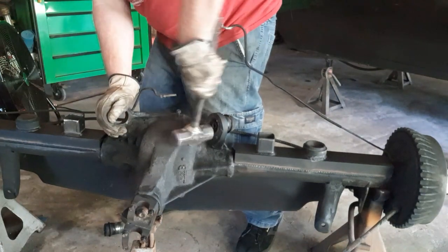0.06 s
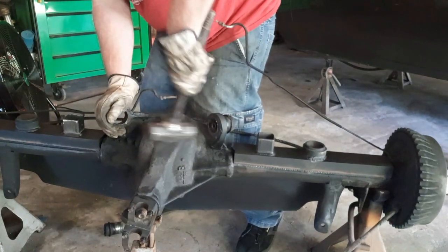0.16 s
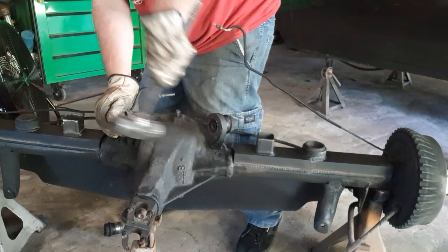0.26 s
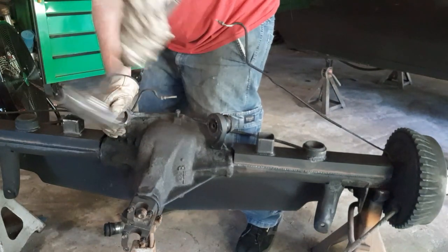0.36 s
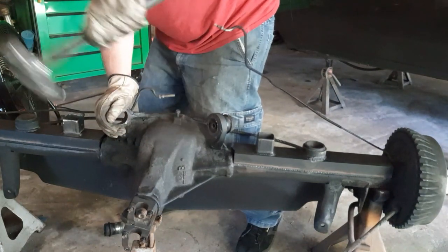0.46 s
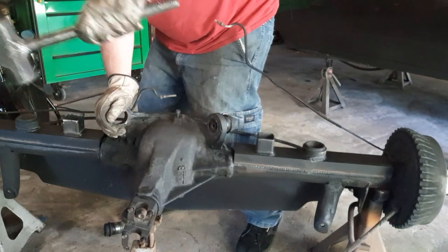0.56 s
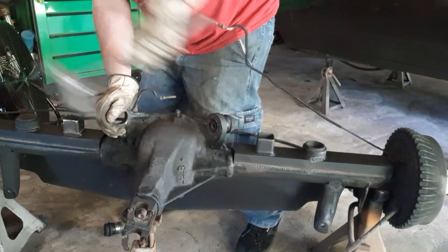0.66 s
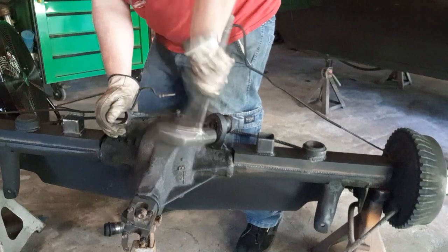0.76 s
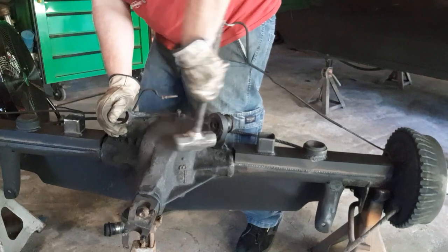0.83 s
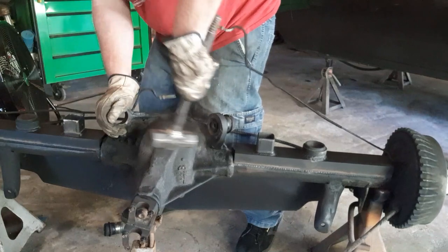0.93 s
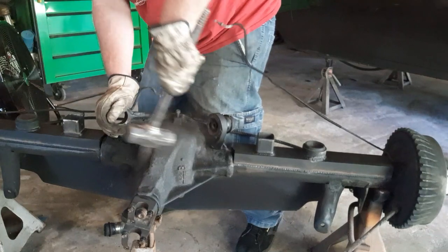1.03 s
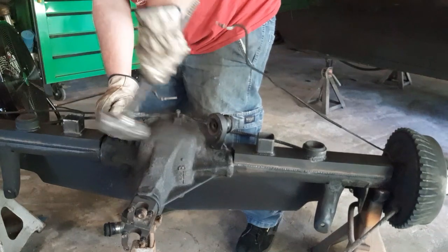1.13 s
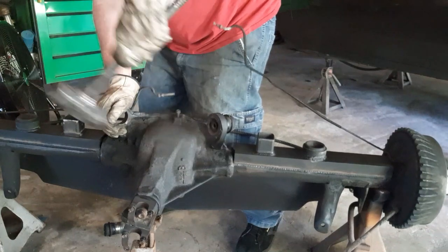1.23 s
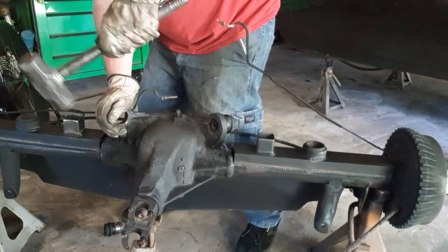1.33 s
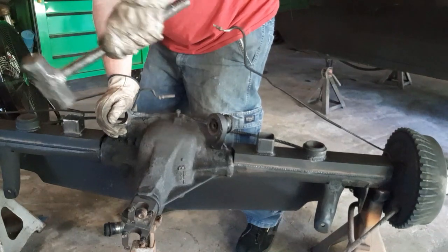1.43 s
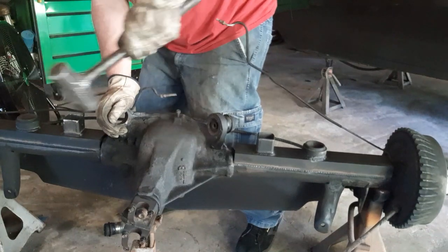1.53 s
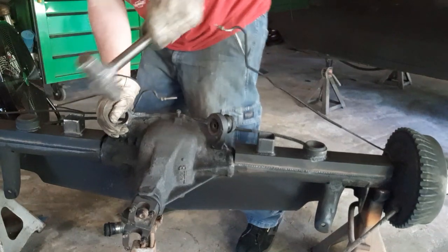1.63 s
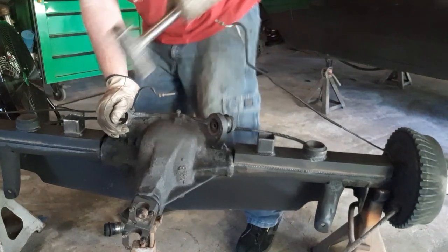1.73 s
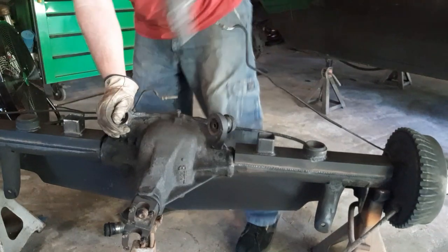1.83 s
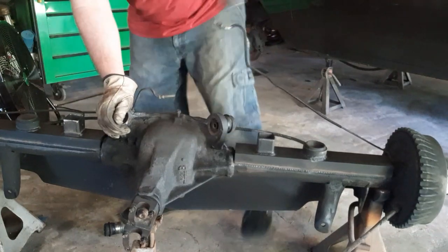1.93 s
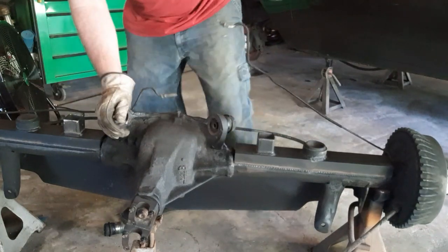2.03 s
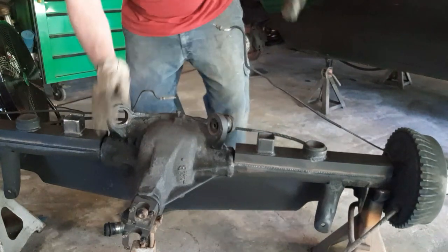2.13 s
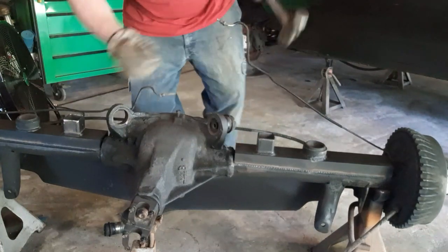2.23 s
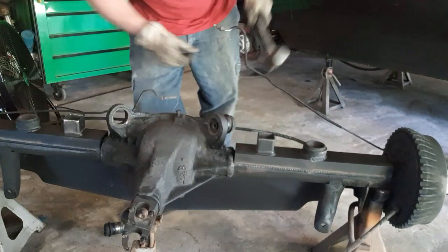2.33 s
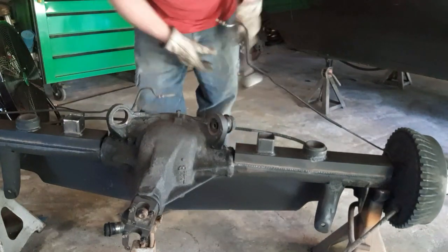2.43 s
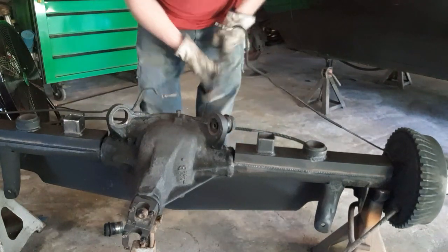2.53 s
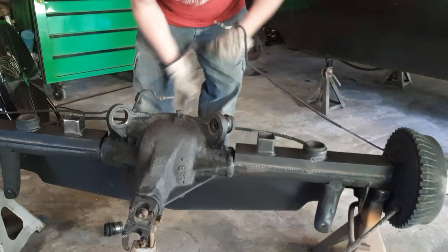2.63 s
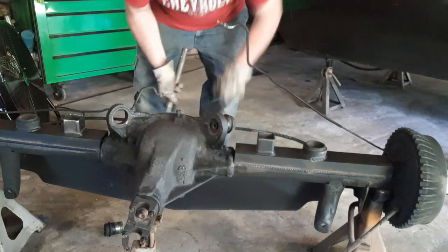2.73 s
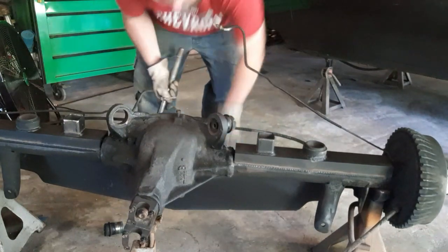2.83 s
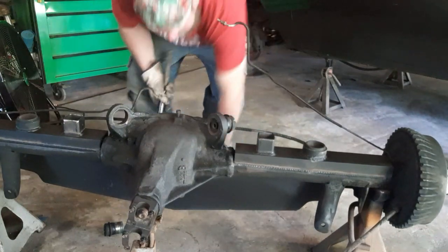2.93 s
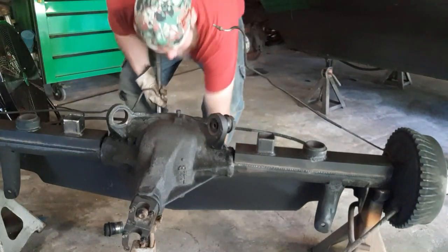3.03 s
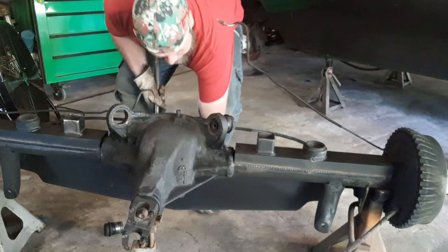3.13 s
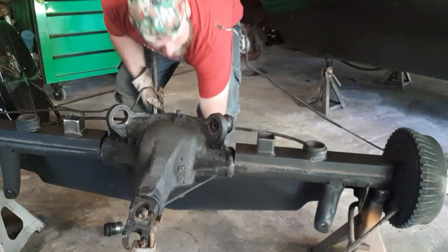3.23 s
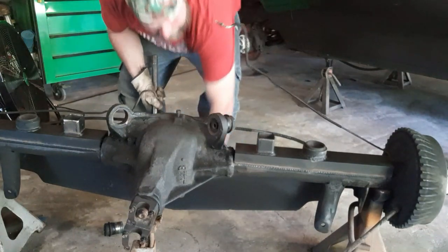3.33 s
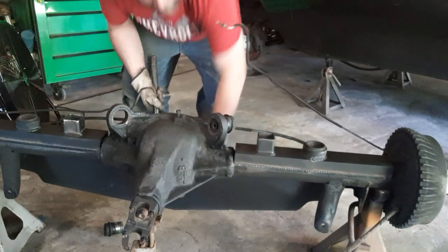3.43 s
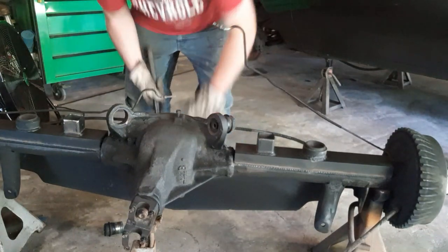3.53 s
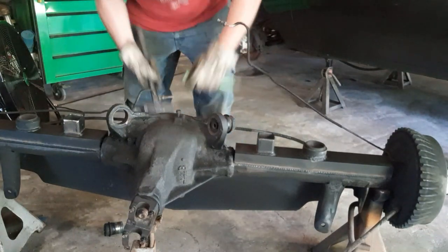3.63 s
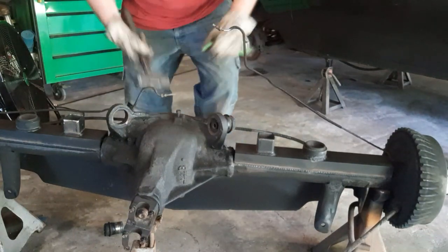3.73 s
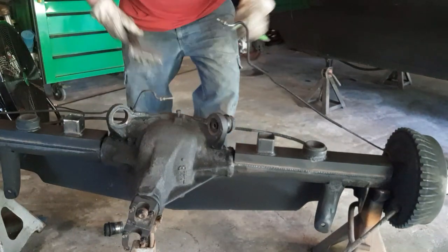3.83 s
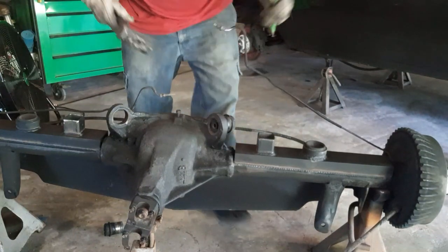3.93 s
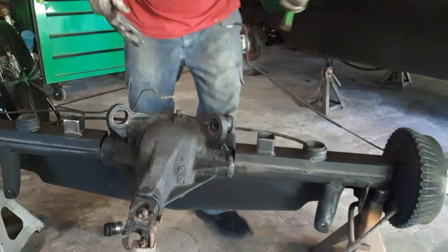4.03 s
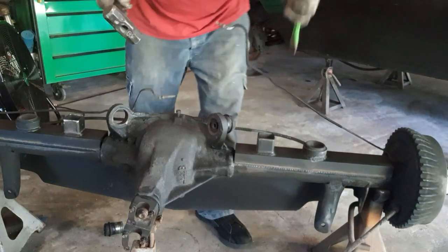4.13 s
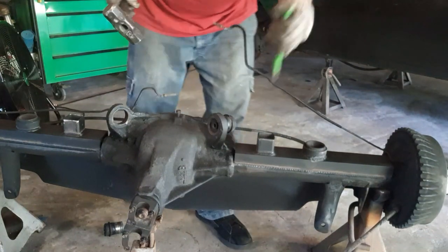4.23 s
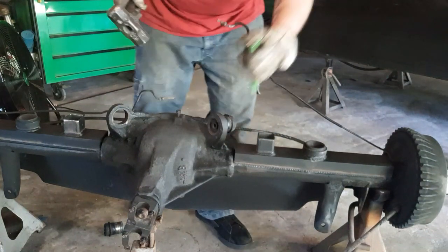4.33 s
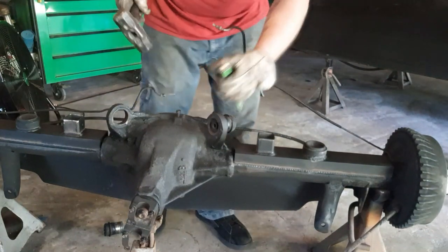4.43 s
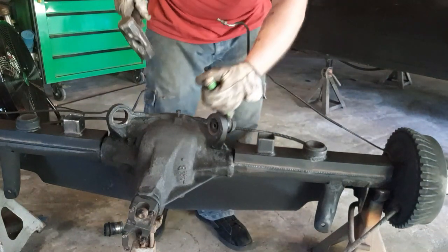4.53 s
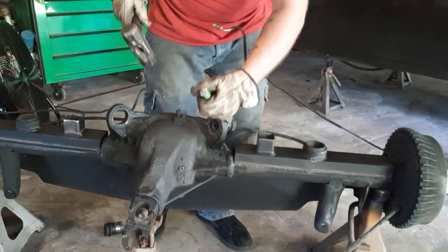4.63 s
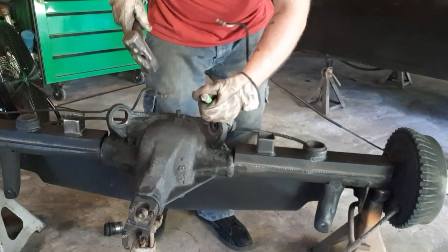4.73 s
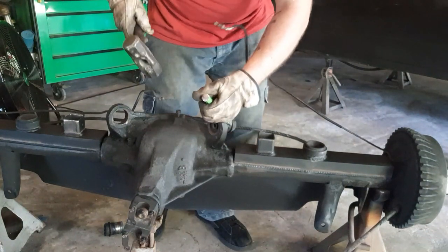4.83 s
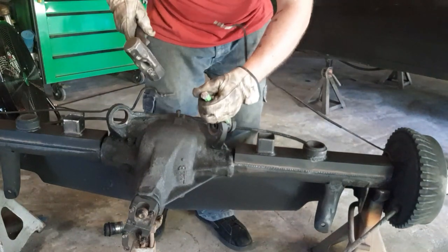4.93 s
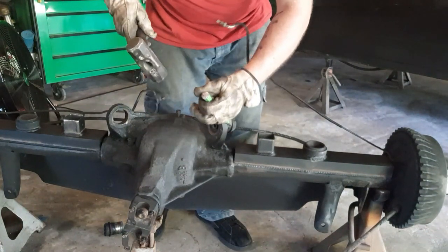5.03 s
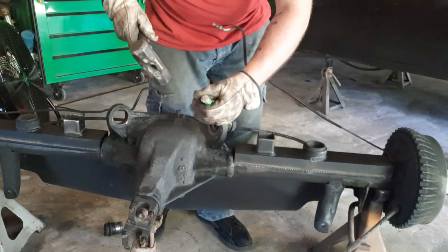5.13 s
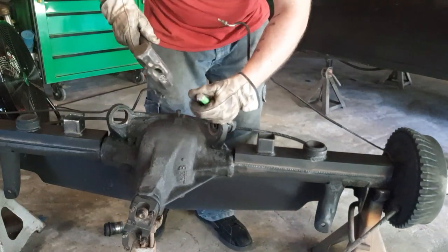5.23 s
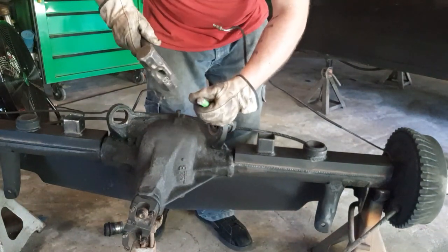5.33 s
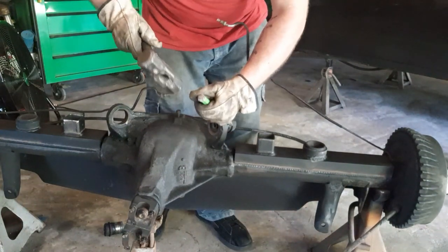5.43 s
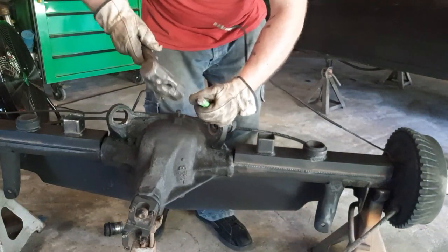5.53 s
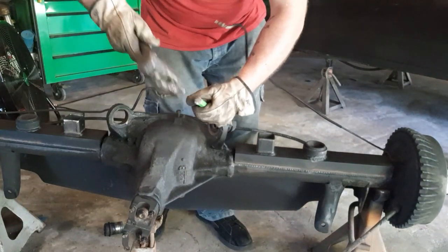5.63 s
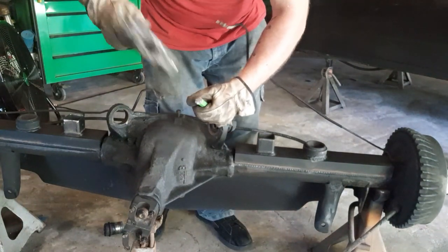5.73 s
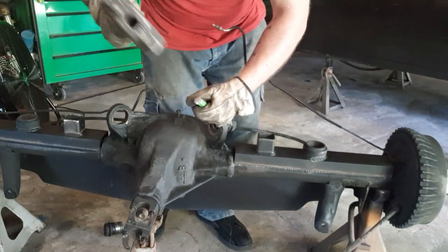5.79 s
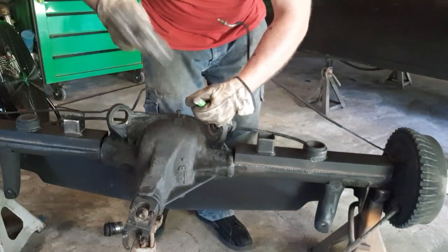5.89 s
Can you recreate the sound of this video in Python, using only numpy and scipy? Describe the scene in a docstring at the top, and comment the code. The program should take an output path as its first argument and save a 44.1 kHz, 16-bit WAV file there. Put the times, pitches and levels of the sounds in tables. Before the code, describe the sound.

A small, hard-surfaced garage heard close up in stereo. Just after 0 s, while an earlier lighter blow still rings, a hammer hits steel against a heavy cast axle housing: a violent crack, bright clang, short rattle and low thud from the stands. A second, sharper and drier blow lands at 0.8 s. The dense clang dies quickly, leaving a thin, wavering metallic ring; the gain stays ducked, then recovers around 1.8 to 2.1 s, lifting the faint ring and air. At 2.3 s there is a dull low bump that rings, then gritty shoe, glove and cloth scuffs at 2.5 and 2.75 s, the latter with a knock. A loose steel tool slides and clinks in quick succession at 3.2 to 3.4 s. Lighter scuffs follow at 3.6 and 4.0 s, a stronger one near 4.5, a small metal tap at 4.65, a soft ringing bump at 5.1 and a tiny tick at 5.4, over low rumble.

```python
"""A small garage, close up: two last hammer blows on a steel drift set against a cast axle housing, then handling.
The housing rings in damped modes, under a noise crack, a rattle and a thud of the axle on its stands.
Shoes, gloves and cloth scuff as shaped noise; the housing is tapped, a loose steel tool and a small part clink.
Crack and clinks also reach the two microphone ports by way of the room, over still air and a low rumble.
The camera's gain control ducks on the blows and recovers about a second later."""
import sys
import numpy as np
from scipy import signal
from scipy.fft import rfft, irfft
from scipy.io import wavfile

SR = 44100
rng = np.random.default_rng(int(sys.argv[2]) if len(sys.argv) > 2 else 0)


def to_wav(s):
    """Save 16-bit WAV."""
    ch = np.atleast_2d(s).T  # columns
    pcm = np.round(np.clip(ch, -1, 1) * 32767)  # PCM
    wavfile.write(sys.argv[1], SR, pcm.astype(np.int16))


def undo_db(level):
    """Turn decibels back into plain size, where 20 dB means ten times bigger."""
    steps = np.asarray(level, float) / 20
    return 10 ** steps


N = 262836
LEAD = SR  # samples run before time zero, so that earlier sound is already under way
TIME = np.arange(-LEAD, N) / SR
HZ = np.maximum(np.fft.rfftfreq(len(TIME), 1 / SR), 1)

# Contacts on the housing. Each row: time in seconds, relative ring in dB, clatter in dB,
# clatter decay time in seconds, contact brightness in Hz, relative thud in dB.
CONTACTS = [(0.0567, 1, 6.5, 0.026, 18000, -12.5), (0.8094, 2, 5.5, 0.011, 14870, -27),
            (2.048, -75, -46, 0.0015, 20020, -77.5), (2.317, -29, -28.5, 0.02, 240, -68),
            (2.751, -51, -33.5, 0.019, 6100, -60.5), (3.162, -73, -56, 0.0029, 20000, -69),
            (4.019, -64, -58, 0.0019, 9600, -55.5), (4.649, -39.5, -37, 0.035, 2600, -73.5),
            (4.789, -67.5, -53, 0.0029, 14000, -88), (5.078, -26, -38.5, 0.013, 667, -72),
            (5.379, -45.5, -70, 0.0035, 4000, -63)]
# Modes of housing and axle tubes. Each row: frequency in Hz, relative level in dB, time to fall 60 dB in seconds.
HOUSING_MODES = [(256, -50, 2.1), (297, -49, 1.8), (409.3, -54, 6.9), (474.7, -38.5, 2.7), (522, -15, 0.34),
                 (552.2, -36.5, 1.3), (684, -40, .6), (765, -60, 3.1), (843, -14, 0.23), (1111, -26, 0.85),
                 (1210, -57.5, 2.0), (1296, -24.5, 0.7), (1464, -19, .3), (1588.4, -38, .9),
                 (1775, -46, 1.7), (1846, -18, 0.14), (2097, -14.5, 0.065), (2400, -51, 1.0),
                 (2605, -54, 1.5), (2695, -16, 0.1), (2810, -61, 1), (3197, -58.5, 1.4), (3419, -19.5, .33),
                 (3733, -16, .28), (4020, -15, 0.14), (3830, -62, 2.9), (4170, -62.5, 1.5),
                 (6650, -14.5, 0.37), (11700, -20.5, .22), (13500, -22.5, .25), (14065, -13.5, .3),
                 (3700, -54.5, 1.2)]
# How alike the left and right ports hear a sound. Each row: frequency in Hz, likeness from 0 to 1.
PORT_LIKENESS = [(50, 0.6), (300, 1), (700, 0.2), (1200, .05), (12000, 0.1)]


def along(table, hz):
    """Read a (Hz, value) table on a log frequency axis."""
    f, v = np.transpose(table)
    return np.interp(np.log(hz), np.log(f), v)


def pair(gain):
    """Left and right noise shaped by a spectrum, alike in the bass and less so above, at unit level."""
    likeness = np.clip(along(PORT_LIKENESS, HZ), 0, 1)
    mid = rfft(rng.standard_normal(len(TIME))) * gain * np.sqrt(1 + likeness)
    side = rfft(rng.standard_normal(len(TIME))) * gain * np.sqrt(1 - likeness)
    x = irfft(np.array([mid + side, mid - side]), len(TIME))
    return x / x.std()


def sides(mode, hz):
    """Higher modes reach the two ports up to a quarter cycle apart."""
    delay = round(SR / (4 * hz) * (1 - along(PORT_LIKENESS, hz)))
    return np.array([mode, np.roll(mode, delay)])


def ring(push, hz, t60):
    """One damped mode driven by a force: a two-pole resonator."""
    r = np.exp(-np.log(1000) / (t60 * SR))
    w = 2 * np.pi * hz / SR
    return signal.lfilter([r * np.sin(w)], [1, -2 * r * np.cos(w), r * r], push)


def burst(s, length):
    """Envelope with a sudden start that dies away exponentially over its length."""
    out = np.zeros(len(TIME))
    i = np.searchsorted(TIME, s)
    span = slice(i, i + int(14 * length * SR))
    out[span] = np.exp((s - TIME[span]) / length)
    return out


def flicker(rate, db, size=16):
    """Gain that wanders by db (standard deviation), new about rate times a second."""
    coarse = TIME[::size]
    hz = np.fft.rfftfreq(len(coarse), size / SR)
    x = irfft(rfft(rng.standard_normal(len(coarse))) / (1 + (hz / rate) ** 2), len(coarse))
    return np.interp(TIME, coarse, undo_db(db * x / x.std()))


def housing():
    """Each contact rings the modes in its own mix; softer contacts reach only the low ones."""
    # an earlier, lighter blow is still ringing; it favoured one mode
    earlier_s, earlier_db, favoured_hz, favoured_db = -0.48, -26, 1303, 32
    mix = undo_db(0.61 * rng.standard_normal((len(CONTACTS), len(HOUSING_MODES))))
    out = 0
    for k, (hz, db, t60) in enumerate(HOUSING_MODES):
        push = np.zeros(len(TIME))
        favour = favoured_db / (1 + ((hz - favoured_hz) / 10) ** 2)
        push[np.searchsorted(TIME, earlier_s)] = undo_db(earlier_db + db + favour)
        for (s, ring_db, _, _, bright, _), m in zip(CONTACTS, mix):
            push[np.searchsorted(TIME, s)] = undo_db(ring_db + db) * m[k] / (1 + (hz / bright) ** 2)
        # close partner modes make every ring waver
        out = out + sides(ring(push, hz, t60) * flicker(1.0, 1.1), hz)
    return out


def clatter():
    """Sharp crack of each contact, loose parts rattling in quick grains, and the thud of the axle on its stands."""
    # Colour of crack and rattle. Each row: frequency in Hz, relative level in dB per Hz.
    clatter_colour = [(60, -29), (150, -8.5), (270, -1.5), (400, -1), (550, -2.5), (1000, 0), (2500, 0.5),
                      (4500, 1.5), (6500, 4), (9000, -1.5), (12500, -2.5), (15000, -8.5)]
    # the rattle passes through the casting, so it clusters around its strong modes
    body = 1 + sum(undo_db(19.5 + db) / (1 + ((HZ - hz) / 35) ** 2) for hz, db, _ in HOUSING_MODES)
    steel = pair(undo_db(along(clatter_colour, HZ)) * body) * flicker(330, 3.5)
    left = undo_db(np.array([[3.0], [-3.0]]))  # the stands are nearer the left port
    stands = pair(1 / (1 + (75 / HZ) ** 2) / (1 + (HZ / 140) ** 4)) * left
    out = 0
    for s, _, db, length, bright, thud_db in CONTACTS:
        soft = signal.lfilter(*signal.butter(1, min(bright, 20000), fs=SR), steel)
        crack_and_rattle = soft * (burst(s, length) + 0.74 * burst(s, 0.0016))
        thud_noise = 0.29 * stands * burst(s, 0.025)
        thud_ring = 3.9 * left * ring(np.gradient(burst(s, 0.0012)), 120, 0.05)
        out = out + undo_db(db) * crack_and_rattle + undo_db(thud_db) * (thud_noise + thud_ring)
    return out


def clinking_steel(modes, touches):
    """Steel slides and clinks; each touch feeds the ringing and favours low or high modes."""
    out = 0
    scrapes = [burst(s, n) / (n * SR) for s, _, n, _ in touches]
    for hz, db, t60 in modes:
        octaves = np.log2(hz / 3000)
        touch = sum(undo_db(d + tilt * octaves) * e for (_, d, _, tilt), e in zip(touches, scrapes))
        push = 2 * touch * np.cos(2 * np.pi * hz * TIME)
        out = out + undo_db(db) * sides(ring(push, hz, t60) * flicker(61, 4.2), hz)
    return out


def loose_tool():
    """A loose steel bar slides and clinks, each touch ringing its modes."""
    # Each row: time in seconds, relative level in dB, scrape decay time in seconds, tilt in dB per octave.
    clinks = [(3.227, -47.5, 0.0033, -4), (3.304, -44, 0.0067, 4.5), (3.333, -37.5, 0.0093, 5),
              (3.362, -45, 0.0061, -1.5), (3.422, -66.5, 0.0023, -11), ]
    # Each row: frequency in Hz, relative level in dB, time to fall 60 dB in seconds.
    bar_modes = [(1255, -6.5, 0.27), (3250, 0, 0.14), (3450, 6.5, 0.095), (5870, 2, 0.078),
                 (5896, -6, 0.146), (6570, -10.5, 0.27), (3930, -18, 0.047)]
    return clinking_steel(bar_modes, clinks)


def small_part():
    """A small steel part knocks against the housing and rings in its own modes."""
    # Each row: time in seconds, relative level in dB, scrape decay time in seconds, tilt in dB per octave.
    taps = [(4.643, -48, 0.011, -7.5), (5.375, -60.5, 0.0099, 12)]
    # Each row: frequency in Hz, relative level in dB, time to fall 60 dB in seconds.
    part_modes = [(993, -16, .2), (1566, -9.5, .3), (2070, -5, .3), (2330, -9, .2), (3445, -0.5, 0.13),
                  (3935, 2, 0.11), (6030, -6, 0.11), (5950, -10, 0.12), (6650, -14, .12)]
    return clinking_steel(part_modes, taps)


def slide(s, swell, fall):
    """Envelope that swells to a rounded top, then dies away by 20 dB per fall time."""
    out = np.zeros(len(TIME))
    i = np.searchsorted(TIME, s)
    span = slice(i, i + int((swell + 4 * fall) * SR))
    age = TIME[span] - s
    rise = np.sin(np.pi / 2 * np.clip(age / swell, 0, 1)) ** 1.19  # rounder top the lower the power
    out[span] = rise * undo_db(-20 * np.maximum(age - swell, 0) / fall)
    return out


def scuff():
    """Gritty sliding hiss with a dull thud of soles under it, and treble noise set separately for each scuff."""
    # Shoes, gloves and cloth sliding. Each row: start in seconds, peak in dB, swell in seconds,
    # time to die by 20 dB in seconds (negative: silent row), share of dull thud in dB,
    # treble level in dB relative to the peak, set separately for each scuff.
    scuffs = [(1.62, -79, .08, -0.1, 14, 5.5), (2.3, -61, 0.051, 0.19, 1, 2),
              (2.441, -43.5, 0.14, 0.13, -6, 0.5), (2.743, -34.5, 0.02, 0.0967, -15.5, -1.5),
              (2.91, -74.5, 0.0057, 0.32, 4, -16), (3.15, -42.5, 0.053, 0.2568, -9, 5.5),
              (3.3, -52, 0.072, -0.03, -2, 16), (3.636, -57, .02, 0.07, -31, -7),
              (4.018, -53.5, 0.011, 0.06, -7.5, 7.5), (4.05, -57, 0.043, 0.27, -7, -0.5),
              (4.235, -53, 0.044, 0.05, -7.5, 6), (4.453, -35, 0.051, 0.07, -11, -1),
              (4.644, -60, 0.011, -0.05, -6, 11), (4.778, -67, .01, 0.18, -4.5, 11.5),
              (4.875, -74, .005, 1.3, -3, 7), (5.058, -65.5, 0.023, 0.25, 8.5, -1),
              (5.366, -65.5, 0.02, 0.17, 0, 6), (5.65, -81.5, 0.035, 0.44, 11, 10)]
    # Colour of the grit. Each row: frequency in Hz, relative level in dB per Hz.
    grit_colour = [(600, -68), (1200, -6), (1600, -2), (2550, -0.5), (4500, 0.5), (6800, -1), (8000, -9.5),
                   (10000, -24)]
    # Faint rustle of cloth between the scuffs. Each row: time in seconds, level in dB.
    rustle_level = [(1.5, -70.5), (2.03, -70.5), (2.1, -68), (3.75, -68.5), (3.95, -73.5), (4.9, -75.5),
                    (5.5, -79), (5.6, -87), (5.96, -88)]
    grain = flicker(190, 1.06)
    grit = pair(undo_db(along(grit_colour, HZ))) * grain
    dull = pair(1 / (1 + (220 / HZ) ** 4) / (1 + (HZ / 900) ** 2)) * flicker(40, 2.5)
    treble = pair(1 / (1 + (7500 / HZ) ** 8)) * grain
    rustle = undo_db(np.interp(TIME, *np.transpose(rustle_level), left=-120)) * flicker(11.06, 2.4)
    # the rustle holds as much dull noise as grit, and 9.5 dB more treble
    rub, thud, hiss = rustle, rustle, undo_db(9.5) * rustle
    for s, db, swell, fall, dull_db, treble_db in scuffs:
        stroke = undo_db(db) * slide(s, swell, fall)
        rub = rub + stroke
        thud = thud + undo_db(dull_db) * stroke
        hiss = hiss + undo_db(treble_db) * stroke
    return grit * rub + dull * thud + treble * hiss


def garage(x, direct_db=-4, wet_db=-2.0, build_s=.003, late_db=-36, late_stretch=3.5):
    """Direct sound plus a diffuse tail that builds up fast and fades band by band."""
    # Each row: frequency in Hz, time in seconds for the first decay to fall 60 dB.
    room_decay = [(60, 0.073), (160, 0.58), (420, .42), (1100, .36), (2900, 0.3), (6500, 0.25), (9000, 0.2),
                  (14000, 0.19)]
    t = np.arange(SR) / SR
    field = rfft(pair(1)[:, :SR])
    octave = np.log2(np.maximum(np.fft.rfftfreq(SR, 1 / SR), 1))
    tail = 0
    for centre in np.arange(5, 15):  # octave bands from 32 Hz to 16 kHz
        band = irfft(field * np.clip(1 - np.abs(octave - centre), 0, 1), SR)
        fade = np.exp(-np.log(1000) * t / along(room_decay, 2. ** centre))
        # a faint, slower, diffuse ringing lingers under the first decay, weaker in the treble
        late = undo_db(late_db) / (1 + (2. ** centre / 4500) ** 2) * fade ** (1 / late_stretch)
        tail = tail + band * (fade + late)
    tail = tail * (1 - np.exp(-t / build_s))
    tail = undo_db(wet_db) * tail / np.sqrt(np.mean(np.sum(tail ** 2, axis=1)))
    return undo_db(direct_db) * x + signal.fftconvolve(x, tail, axes=1)[:, :len(TIME)]


def background():
    """Still air of the garage and a low wavering rumble that comes up after the blows, both shaped noise."""
    # Each row: time in seconds, rumble level in dB.
    rumble_level = [(2.1, -96.5), (2.4, -69), (2.8, -64.5), (5.96, -62)]
    # Humps of the rumble. Each row: frequency in Hz, width in Hz, relative level in dB.
    rumble_humps = [(85.6, 30, 1), (167, 21, -5.5)]
    # Colour of the air. Each row: frequency in Hz, relative level in dB per Hz.
    air_colour = [(30, -3), (100, 2), (170, 2), (300, -4.5), (500, -1.5), (1500, -10), (7000, -15.5),
                  (11000, -3), (15500, -9.5)]
    shape = sum(undo_db(db) / (1 + (2 * (HZ - hz) / width) ** 2) for hz, width, db in rumble_humps)
    rumble = undo_db(np.interp(TIME, *np.transpose(rumble_level))) * pair(shape) * flicker(3, 1.6)
    return rumble + undo_db(-72) * pair(undo_db(along(air_colour, HZ)))


def scene():
    """Clatter and clinks fill the room; ringing and scuffing stay close and dry."""
    clinks = loose_tool() + small_part()
    near = housing() + scuff() + clinks
    room = garage(clatter() + undo_db(-4.5) * clinks)
    return (near + room + background())[:, LEAD:]


def roll_off(x):
    """The treble ends steeply here."""
    return signal.sosfilt(signal.butter(12, 16990, fs=SR, output="sos"), x)


def record(dry, loud_db=-14, duck_db=12.0, hold_s=0.96, recover_db_per_s=40, ceiling=3.3):
    """Two microphone ports, gain control that ducks on loud sound and holds, soft overload."""
    # Microphone response. Each row: frequency in Hz, gain in dB.
    mic_response = [(20, -4), (6900, 0), (7700, -11.5), (11000, -11.5), (15600, -18), (16300, -61.5)]
    # Balance of the ports. Each row: frequency in Hz, left minus right in dB.
    port_balance = [(30, 2.5), (100, 1.5), (250, -0.5), (12000, 0.1)]
    hz = np.maximum(np.fft.rfftfreq(N, 1 / SR), 1)
    split = undo_db(along(port_balance, hz) / 2)
    x = irfft(rfft(dry) * undo_db(along(mic_response, hz)) * np.array([split, 1 / split]), N)
    # time since the last loud sample sets the gain
    loud = np.abs(x).max(axis=0) > undo_db(loud_db)
    last = np.maximum.accumulate(np.where(loud, np.arange(N), -N))
    quiet_s = (np.arange(N) - last) / SR
    recovered_db = recover_db_per_s * np.maximum(quiet_s - hold_s, 0)
    x = x * undo_db(np.minimum(0, recovered_db - duck_db))
    return roll_off(ceiling * np.tanh(x / ceiling))


dry = scene()
out = record(dry)
to_wav(out)
```